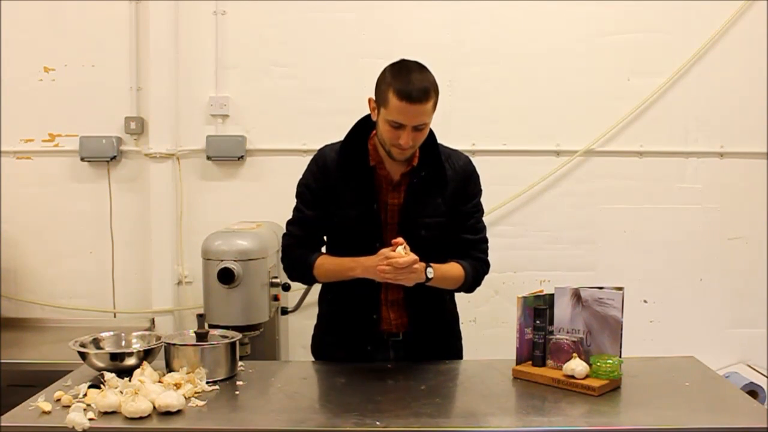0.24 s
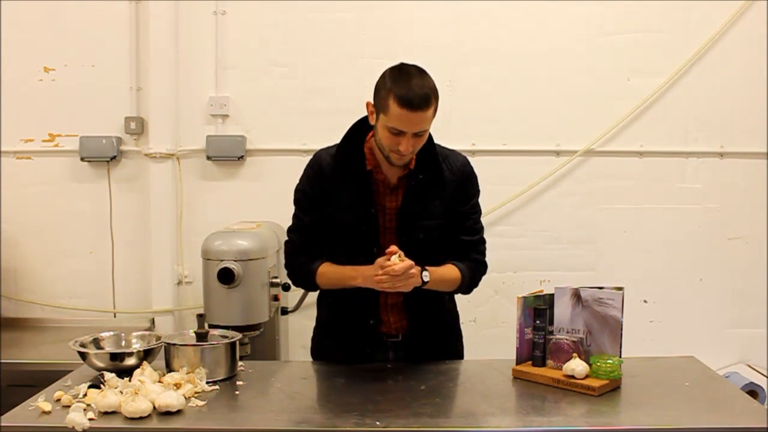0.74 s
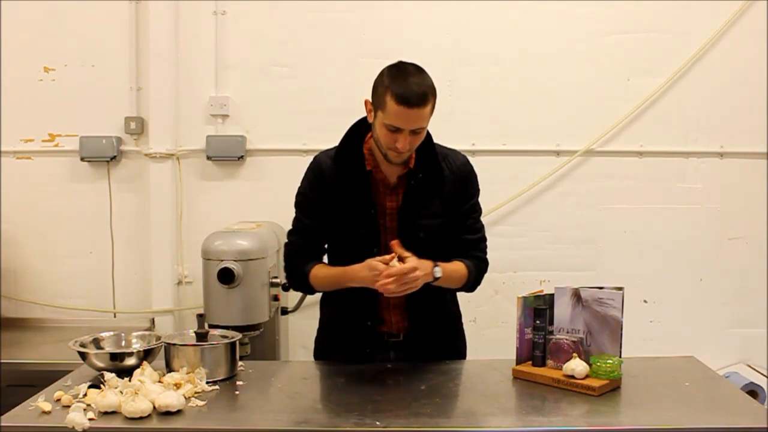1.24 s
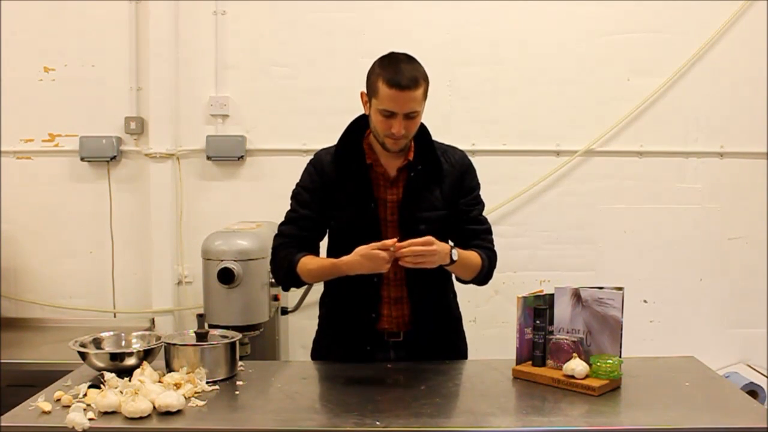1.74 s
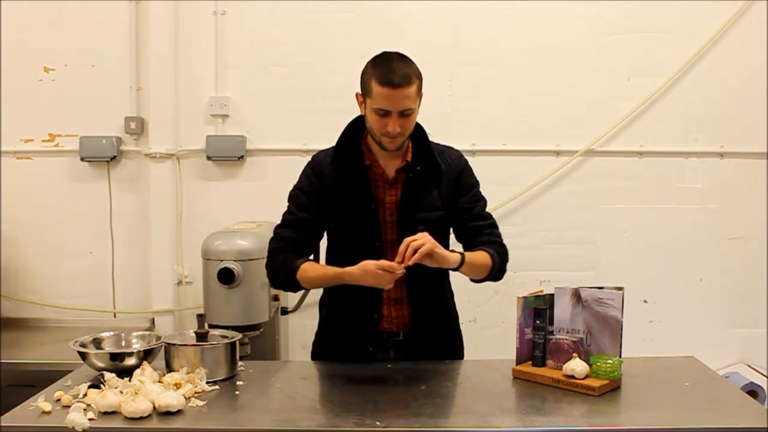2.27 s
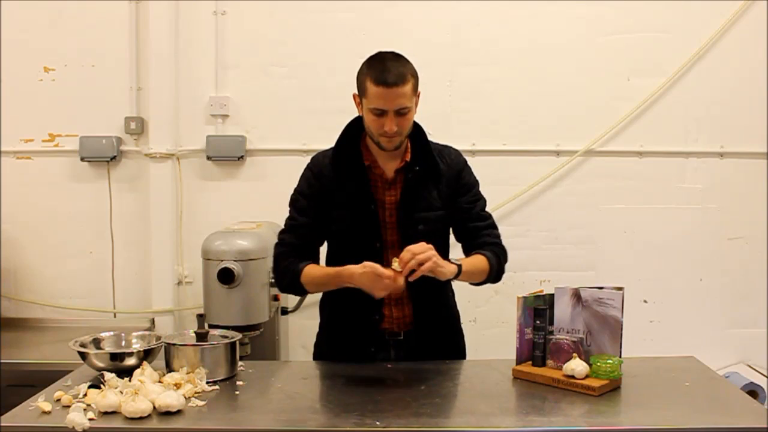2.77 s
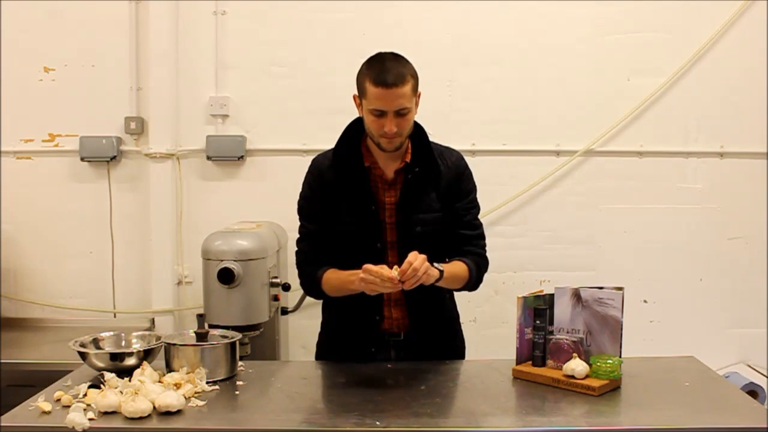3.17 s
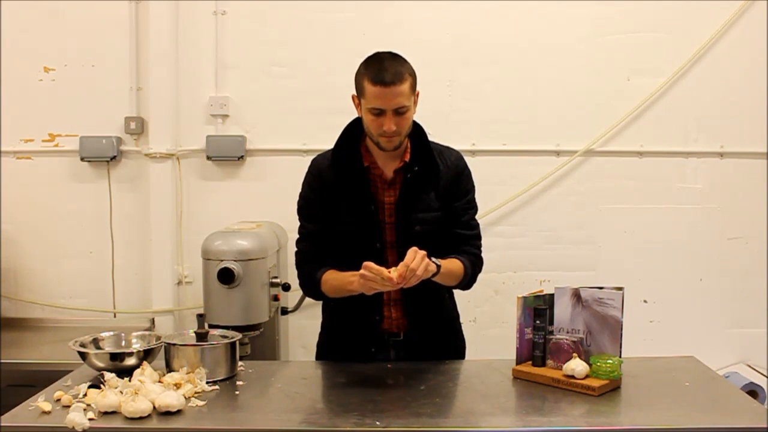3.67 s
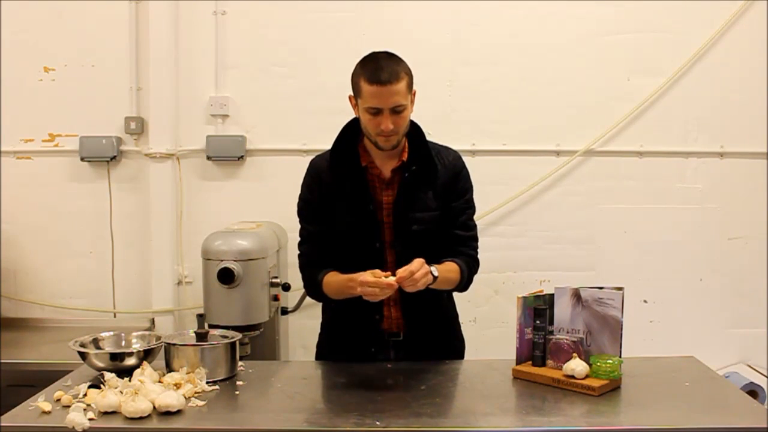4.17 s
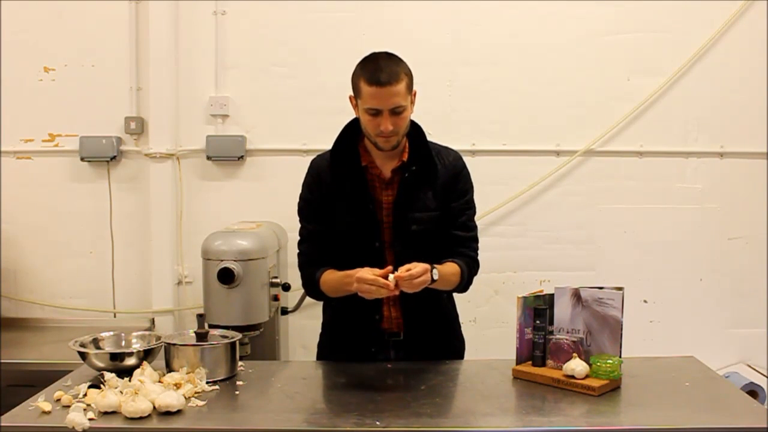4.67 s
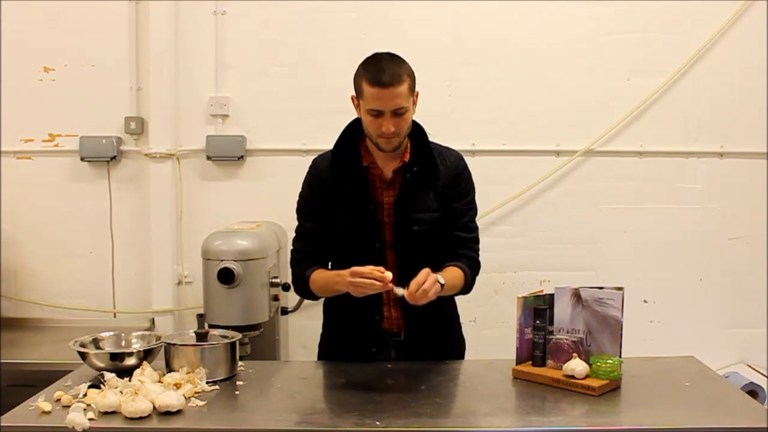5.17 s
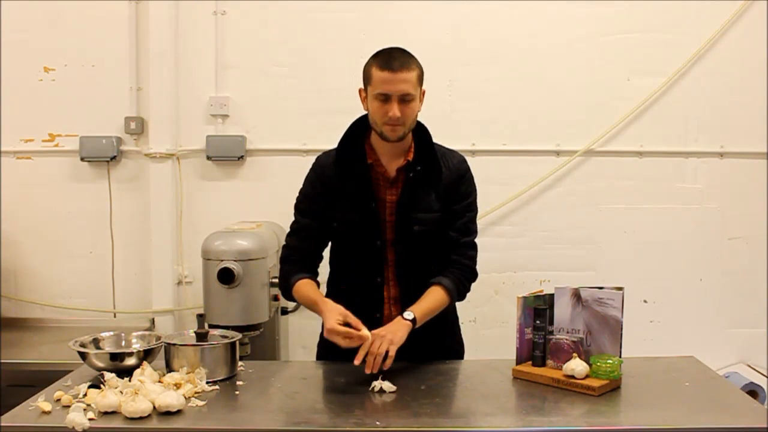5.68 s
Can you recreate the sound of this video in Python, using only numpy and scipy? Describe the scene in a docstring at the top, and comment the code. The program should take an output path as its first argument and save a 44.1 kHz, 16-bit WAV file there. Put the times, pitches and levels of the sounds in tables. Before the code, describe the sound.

Fingers peel a garlic clove a few metres from the microphone in a bare, reflective kitchen. Sharp cracks come first, then a sparse, quieter spell, then dense bursts of snaps and papery crackle from the middle on. Each tick gets quick echoes and a thin hissy tail. A last small cluster sounds as the peeled skin is put down, over soft ventilation rumble.

```python
"""Peeling a garlic clove

Fingers pinch and peel a clove in a bare, hard-walled kitchen, a few metres from the microphone.
Skin cracks, pops and rustling grains are short pulses through resonances, some ringing the cupped hands.
Table and walls echo each tick, and decaying noise draws it out into a hiss.
Ventilation noise and drones, shaped from random noise, lie underneath."""
import sys
import numpy as np
from scipy import signal
from scipy.fft import rfft, irfft
from scipy.io import wavfile

SR = 44100
rng = np.random.default_rng(int(sys.argv[2]) if len(sys.argv) > 2 else 0)


def wrap_up_sound(samples):
    """Save the sound to the file named by the first command line argument, as 16-bit audio."""
    columns = np.atleast_2d(samples).T
    # keep every value between -1 and 1, then stretch to whole-number steps
    tamed = np.clip(columns, -1, 1)
    steps = np.round(tamed * 32767).astype(np.int16)
    wavfile.write(sys.argv[1], SR, steps)


def volts_from_decibels(level):
    """Turn decibel levels (scalar or array-like) into linear amplitude factors."""
    exponent = np.asarray(level, float) / 20
    return 10 ** exponent


N = 260833
LEAD = 16384  # samples of lead-in, so that earlier ticks still ring at the start
PLACES = 4  # hand places, each with its own room response


def skin():
    """Peeling ticks: sound straight to the microphone, and sound filling the room from each hand place."""
    flake_hz = 170
    direct, around = np.zeros(N + LEAD), np.zeros((PLACES, N + LEAD))
    cracks_and_bounces(direct, around)
    pops_and_rings(direct, around)
    rustle(direct, around)
    return thin(direct, flake_hz), thin(around, flake_hz)


# Skin cracks, and a few strong bounces that follow a crack by about 10 ms.
# Each row: start in seconds, snap energy in dB, snap resonance in Hz,
# energy rung into the hand hollow in dB. Energies precede the hand and flake filters.
CRACK_AND_BOUNCE_ROWS = [(.0887, -16.5, 11000, -10), (.0974, -19, 12000, -30), (.1691, -22, 8500, -30),
                         (.1944, -30, 8000, -19.5), (.3087, -31, 15000, -36), (.3561, -17, 13000, -45.5),
                         (.3799, -33, 12100, -35), (.4304, -35, 11300, -44), (.4522, -5.5, 11200, -13),
                         (.4539, -6, 14200, -7), (.5211, -20, 12100, -9), (.6213, -18.5, 14000, -19.5),
                         (.7259, -13, 9250, -12.5), (.7341, -9.5, 7460, -23), (.8182, -14.5, 5500, -7),
                         (.9978, -24, 11300, -31), (1.0259, -21.5, 11500, -25),
                         (1.0869, -11.5, 13700, -18.5), (1.1168, -38, 11300, -23.5),
                         (1.4125, -41, 13000, -45), (1.4317, -18, 10600, -23), (1.4575, -43, 6000, -21),
                         (1.4756, -44, 6000, -31), (1.5142, -26, 10800, -19.5), (1.6396, -35, 5750, -24),
                         (1.7918, -32.5, 9800, -23.5), (1.9417, -39, 11300, -34),
                         (1.9546, -57, 10500, -24.5), (2.0126, -36.5, 10500, -26),
                         (2.0769, -42, 9750, -19.5), (2.1112, -33, 13400, -12.5), (2.209, -37, 6760, -36),
                         (2.2793, -26, 11300, -22), (2.2949, -18, 7260, -13), (2.3041, -29, 5970, -7.5),
                         (2.3143, -31, 7400, -23), (2.3259, -14.5, 10300, -17), (2.3355, -20, 11500, -30),
                         (2.4856, -19, 14000, -38), (2.5183, -26, 12100, -39), (2.6056, -17.5, 10700, -21),
                         (2.6209, -16, 15100, -7), (2.643, -32, 9200, -31), (2.7527, -24.5, 11300, -35),
                         (2.7682, -30, 11200, -30), (2.935, -22.5, 9600, -47), (3.0505, -2.5, 13600, -36),
                         (3.0554, -25, 14500, -14), (3.1009, -13, 8500, -36), (3.1091, -12, 9700, -21),
                         (3.1315, -6, 14000, -19), (3.1344, -18, 9800, -22), (3.1722, -13, 11300, -21),
                         (3.1822, -10, 10500, -40), (3.2158, -13, 9900, -17), (3.2297, -34, 9200, -18.5),
                         (3.515, -12, 12100, -21), (3.5186, -12, 13000, -15.5), (3.6147, -15, 11000, -12.5),
                         (3.6292, -24, 12000, -24), (3.6361, -14, 10300, -20), (3.6504, -5, 12400, -38),
                         (3.7077, -26, 11300, -22), (3.7307, -9.5, 8900, -36), (3.7578, -10.5, 11400, -9),
                         (3.8607, -22, 10200, -35), (3.8983, -28, 15000, -43), (3.9272, -19, 15000, -35),
                         (3.9333, -12.5, 14800, -16.5), (4.08, -10, 11300, -10.5),
                         (4.0934, -25, 11200, -26), (4.1073, -31, 8600, -28), (4.1264, -4.5, 7100, -28),
                         (4.1382, -15.5, 7800, -5.5), (4.1725, -13, 14000, -22), (4.2406, -13, 12100, -30),
                         (4.2824, -14.5, 14100, -13.5), (4.377, -24, 12100, -15),
                         (4.4188, -22, 10300, -19.5), (4.5824, -40, 9500, -21.5), (4.6407, -13, 7100, -14),
                         (4.6513, -32.5, 8750, -47), (4.8045, -41, 6260, -25), (4.9124, -17.5, 14000, -42),
                         (4.9212, -24, 10800, -40), (4.9568, -28, 11300, -37), (4.9716, -16, 10000, -7),
                         (5.0075, -16, 13100, -28), (5.0249, -10, 7700, -33), (5.1084, -7, 13800, -7),
                         (5.1408, -7, 10600, -14), (5.4734, -18, 7300, -19.5), (5.4763, -24, 9700, -24),
                         (5.5023, -17.5, 8400, -23)]


def cracks_and_bounces(direct, around):
    """Each crack or strong bounce is a frayed snap plus a click that rings the hollow of the hands."""
    facing_db, facing_slope = -24.5, 0.19  # louder cracks break on the near side of the clove; dB per dB
    hollow_direct_db, hollow_shade = -3, .6
    click = np.eye(1, 256)[0]
    frays = tears(len(CRACK_AND_BOUNCE_ROWS), fray_s=.0005, fray=.2)
    for k, (start_s, snap_db, snap_hz, hollow_db) in enumerate(CRACK_AND_BOUNCE_ROWS):
        away_db = hands(start_s, column=3) - facing_slope * (snap_db - facing_db)
        snap = tick(thin(frays[k], 0.68 * snap_hz), snap_hz, 0.76, snap_db)
        hollow = tick(click, hands(start_s, column=1), hands(start_s, column=2), hollow_db)
        hollow_gain = volts_from_decibels(hollow_direct_db - hollow_shade * away_db)  # hands turned away hide it
        add(direct, start_s, snap + hollow_gain * hollow)
        # fingers shade the treble in some directions
        add(around[k % PLACES], start_s, volts_from_decibels(away_db) * snap + hollow)


# Pops and rings, one of them (at 3.6592 s) a bright echo of the crack just before.
# Each row: start in seconds, energy sent into the room in dB before the flake filter,
# resonance in Hz, sharpness Q of each of two passes.
POP_AND_RING_ROWS = [(-.05, -14.5, 2940, 0.83), (.0887, -17, 1500, 0.56), (.0974, -12.5, 7770, 7.2),
                     (.0887, -14, 11800, 7.5), (.4539, -18.5, 2880, 3.1), (.4522, -12, 5740, 5.5),
                     (.5211, -20, 3500, 6.3), (.7341, -10.5, 3170, 2.1), (.8182, -19.5, 2330, 1.1),
                     (1.54, -30, 1940, 5.1), (2.621, -26.5, 2000, 5), (3.0507, -14.5, 3280, 1.1),
                     (3.1091, -24, 3200, 0.92), (3.2297, -17.5, 2950, 1), (3.514, -19, 1890, 2.9),
                     (3.515, -16.5, 6140, 3.8), (3.6504, -18, 2410, 0.45), (3.6592, -12, 10200, 3.4),
                     (3.933, -22.5, 2050, 1.4), (4.1072, -16.5, 1700, 2.4), (4.1382, -17.5, 2420, 1.9),
                     (4.2406, -19, 2100, 4.2), (4.6407, -19, 6200, 3.9), (4.9716, -17, 2250, 2.8),
                     (5.0443, -15.5, 2280, 0.35), (5.1408, -14, 5450, 6.7), (5.473, -22.5, 836, 0.94),
                     (5.49, -27.5, 270, 4), (5.4763, -26.5, 2630, 1.2), (5.503, -23, 1120, 2.6)]


def pops_and_rings(direct, around):
    """Each is one click twice through a resonance, weaker straight ahead than into the room."""
    click = np.eye(1, 512)[0]
    for k, (start_s, energy_db, hz, q) in enumerate(POP_AND_RING_ROWS):
        ring = tick(click, hz, q, energy_db)
        add(direct, start_s, volts_from_decibels(-7.5) * ring)
        add(around[k % PLACES], start_s, ring)


def rustle(direct, around):
    """Random small tears, each a bright grain plus a faint ring of the hand hollow."""
    grains_per_s = 250
    count = int(grains_per_s * (N + LEAD) / SR)
    when, size, colour = rng.random((count, 3)).T
    when_s = (when * (N + LEAD) - LEAD) / SR
    grain_db = rustle_db(when_s) - 2.5 * np.log(1 - size)  # a few grains stand out
    hollow_hz, hollow_q = hands(when_s, column=1), hands(when_s, column=2)
    for k, tear in enumerate(tears(count, fray_s=0.0006, fray=0.91)):
        bright = tick(tear, 7000 + 5600.0 * colour[k], 0.56, grain_db[k])
        hollow = tick(tear, hollow_hz[k], hollow_q[k], grain_db[k] - 16.5)
        add(direct, when_s[k], bright + hollow)
        add(around[k % PLACES], when_s[k], bright + hollow)


# Pulls on the skin. Each row: peak time in seconds, least grain energy at the peak in dB.
PULL_ROWS = [(.4, -40), (1.1, -59), (2.3, -59), (2.63, -31), (3.19, -33.5), (3.69, -30), (3.9, -39.5),
             (4.28, -28), (4.6, -43), (4.97, -34), (5.13, -29)]


def rustle_db(s):
    """Each pull swells and fades over an idle rustle that drops once the clove is put down."""
    rise_db_s, fall_db_s, idle_db, put_down_s = 94, 91, -47.5, 5.36
    peak_s, peak_db = np.transpose(PULL_ROWS)[:, :, None]
    slope_db = np.where(s < peak_s, rise_db_s * (peak_s - s), fall_db_s * (s - peak_s))
    pulls_db = peak_db - slope_db
    idle = idle_db - fall_db_s * np.clip(s - put_down_s, 0, .25)
    return np.maximum(pulls_db.max(axis=0), idle)


# Hand posture. Each row: time in seconds, hollow resonance in Hz, sharpness Q of the hollow,
# turn away from the microphone in dB before the crack's own facing is added.
HAND_ROWS = [(0, 5000, 2, 5), (.45, 4330, 1.9, 3.5), (.55, 5500, 1.2, 6.5), (.82, 5230, 2, 3),
             (1.0, 4100, 6.1, 0.5), (1.15, 4130, 5.1, 6), (1.42, 5160, 7.1, -1), (1.55, 5350, 1.9, 7.5),
             (1.8, 4450, 4, 8.5), (2.1, 3700, 1.6, 18), (2.3, 4180, 1.9, 5), (2.6, 5010, 2.5, 4),
             (3.05, 5600, 0.98, 3), (3.22, 4900, 0.93, 0), (3.5, 6100, 0.45, 5), (3.76, 6470, 1.4, 5),
             (4.1, 4860, 1.5, 7), (4.4, 5100, 1.34, 9.5), (4.97, 5150, 1.3, 8), (5.12, 5900, 1.25, 6),
             (5.47, 3440, 1.04, -0.5)]


def hands(s, column):
    """One column of the hand posture, gliding between the rows."""
    return np.interp(s, *np.transpose(HAND_ROWS)[[0, column]])


def tears(count, fray_s, fray):
    """One sharp break and its bounce off a nearby finger, within a short ragged fray of fibres."""
    finger_ms, finger_echo = (.2, .8), .35
    t = np.arange(256) / SR
    out = fray * rng.standard_normal((count, len(t))) * np.exp(-t / fray_s)
    out[:, 0] = 1
    bounce = (rng.uniform(*finger_ms, count) * SR / 1000).astype(int)
    out[np.arange(count), bounce] += finger_echo
    return out


def tick(pulse, hz, q, energy_db):
    """A short pulse through the same resonance twice, scaled to the given energy."""
    y = band(band(pulse, hz, hz / q), hz, hz / q)
    return y * volts_from_decibels(energy_db) / np.sqrt(np.sum(y ** 2))


def thin(x, hz):
    """High-pass: a flake of skin is too small to radiate low notes."""
    return signal.lfilter(*signal.butter(3, hz, "high", fs=SR), x)


def band(x, hz, width_hz):
    """Two-pole resonance."""
    hz = min(hz, .4 * SR)
    return signal.lfilter(*signal.iirpeak(hz, max(hz / width_hz, .3), fs=SR), x)


def level(x, db):
    """Scale to an rms level."""
    return x * volts_from_decibels(db) / np.sqrt(np.mean(x ** 2))


def add(out, start_s, sound):
    """Mix a sound in at a time."""
    i = int(start_s * SR) + LEAD
    out[i:i + len(sound)] += sound[:len(out) - i]


# Bounces off the table and the things on it. Each row: delay in ms, level in dB re the straight path.
TABLE_BOUNCES = [(1.8, -10.5), (3.8, -13)]


def table():
    """The straight path, two bounces and the quick scatter off bowls and cloves."""
    clutter_db, clutter_s = -32, .004
    t = np.arange(512) / SR
    out = volts_from_decibels(clutter_db) * rng.standard_normal(len(t)) * np.exp(-t / clutter_s)
    out[0] = 1
    for delay_ms, db in TABLE_BOUNCES:
        out[int(delay_ms * SR / 1000)] += volts_from_decibels(db)
    return out


# First echoes off wall, floor and ceiling. Each row: delay in ms, energy in dB.
WALL_ECHOES = [(8.8, -9), (10.2, -10), (11.7, -18), (14.2, -22), (19.0, -20), (24.0, -23), (32.0, -22)]
# Reverberation time. Each row: band centre in Hz, 60 dB decay time in seconds.
ROOM_DECAY = [(700, 1.04), (1500, 0.82), (3000, 1.11), (5000, 1.06), (8000, 0.72), (12000, 0.56),
              (16000, 0.25)]


def kitchen():
    """Room response: a few clear echoes, and diffuse noise whose bands die at their own rates."""
    room_db, room_start_s = -34.5, 0.0097
    echo_blur_s, echo_bright = .00012, .5
    t = np.arange(SR + SR // 2) / SR
    hz = np.fft.rfftfreq(len(t), 1 / SR)
    noise = rfft(rng.standard_normal(len(t)))
    centres_hz, t60s = np.transpose(ROOM_DECAY)
    out = np.zeros(len(t))
    for k, t60_s in enumerate(t60s):
        share = np.interp(hz, centres_hz, np.arange(len(centres_hz)) == k)
        out += irfft(noise * share, len(t)) * volts_from_decibels(-60 * t / t60_s)
    out *= volts_from_decibels(room_db) * np.clip(t / room_start_s, 0, 1) ** 3
    for delay_ms, db in WALL_ECHOES:
        blur = rng.standard_normal(64) * np.exp(-t[:64] / echo_blur_s)  # brick and pipes roughen each echo
        blur = signal.lfilter([1, -echo_bright], 1, blur)  # small hard surfaces return fewer low notes
        i = int(delay_ms * SR / 1000)
        out[i:i + len(blur)] += volts_from_decibels(db) * blur / np.sqrt(np.sum(blur ** 2))
    return out


# Ventilation spectrum. Each row: frequency in Hz, relative density in dB per Hz.
VENT_SPECTRUM = [(15, -60), (25, -70), (43, -8.5), (149, -2), (206, -7.5), (236, -4), (277, -1), (439, -5),
                 (531, -4.5), (962, -10.5), (1070, -11), (1890, -12), (2550, -14), (4250, -13.5),
                 (16000, -26)]
# Ventilation drones. Each row: frequency in Hz, width in Hz, rms level in dB.
VENT_DRONES = [(152, 41, -70), (776, 100, -65), (916, 42, -68)]
# Faint dull tones far off. Each row: start in seconds, length in seconds, frequency in Hz, width in Hz,
# rms level in dB before the swell.
DISTANT_TONES = [(3.82, .17, 760, 220, -59), (4.76, .16, 1190, 90, -66)]


def air():
    """Ventilation: shaped noise and narrow-band drones, with moving rumble and swelling far tones."""
    t = np.arange(N) / SR
    hz = np.fft.rfftfreq(N, 1 / SR) + 1
    shape_hz, shape_db = np.transpose(VENT_SPECTRUM)
    shape = volts_from_decibels(np.interp(np.log(hz), np.log(shape_hz), shape_db))
    out = level(irfft(rfft(rng.standard_normal(N)) * shape, N), -57.5)
    for f_hz, width_hz, db in VENT_DRONES:
        out += level(band(rng.standard_normal(N), f_hz, width_hz), db)
    deep_db = -71 - 3.5 * t  # a deep drone moves away
    upper_db = -82 + 2.5 * t  # a higher one draws near
    hum_db = -71.5 + 5.5 * np.exp(-((t - 1.35) / 1) ** 2)  # swells around 1.35 s
    for f_hz, width_hz, db in ((54, 12, deep_db), (121.5, 5, upper_db), (201.5, 16, hum_db)):
        out += volts_from_decibels(db) * level(narrow_noise(f_hz, width_hz), 0)
    for start_s, length_s, f_hz, width_hz, db in DISTANT_TONES:
        swell = np.sin(np.pi * np.clip((t - start_s) / length_s, 0, 1))
        out += swell * level(narrow_noise(f_hz, width_hz), db)
    return out


def narrow_noise(hz, width_hz):
    """Noise through the same resonance twice, a wavering tone."""
    return band(band(rng.standard_normal(N), hz, width_hz), hz, width_hz)


def scene():
    """Peeling hands in the kitchen over the ventilation; the room answers each hand place differently."""
    direct, around = skin()
    heard = signal.fftconvolve(direct, table())[:N + LEAD]
    for place in around:
        heard += signal.fftconvolve(place, kitchen())[:N + LEAD]
    return (heard[LEAD:] + air())[None]


def roll_off(x):
    """The treble ends steeply here."""
    return signal.sosfilt(signal.butter(12, 16990, fs=SR, output="sos"), x)


def record(dry):
    """The microphone droops in the treble, then a steep low-pass cuts the top."""
    mic_hz, top_hz = 16000, 16000
    x = signal.lfilter(*signal.butter(2, mic_hz, fs=SR), dry)
    x = signal.sosfilt(signal.ellip(8, .2, 60, top_hz, fs=SR, output="sos"), x)
    return roll_off(x)


dry = scene()
out = record(dry)
wrap_up_sound(out)
```